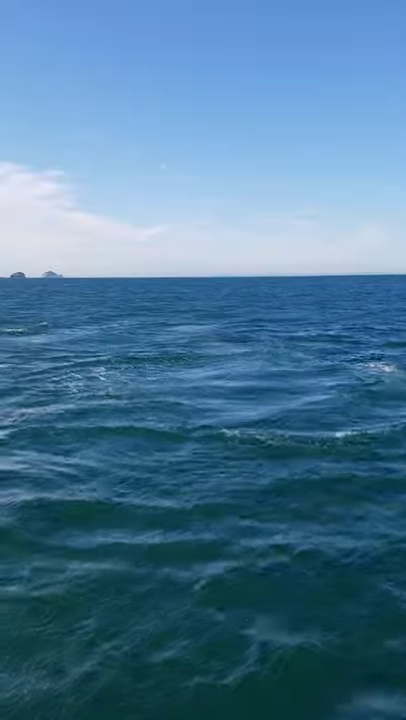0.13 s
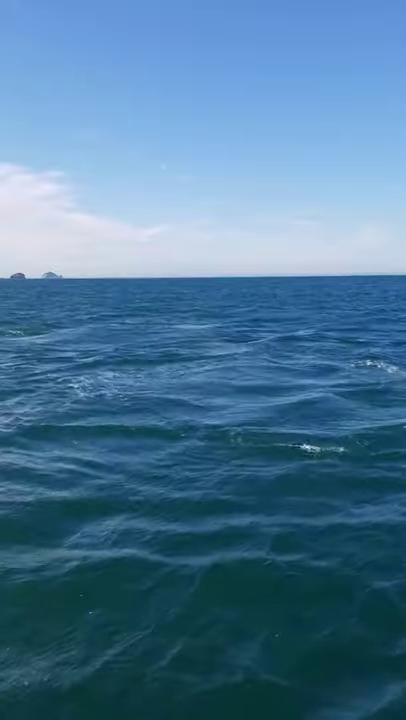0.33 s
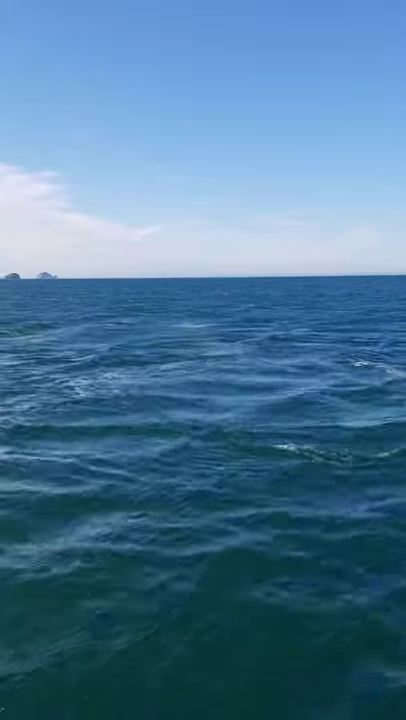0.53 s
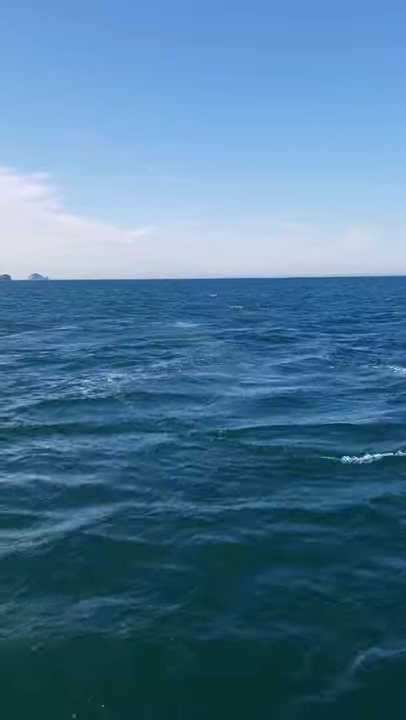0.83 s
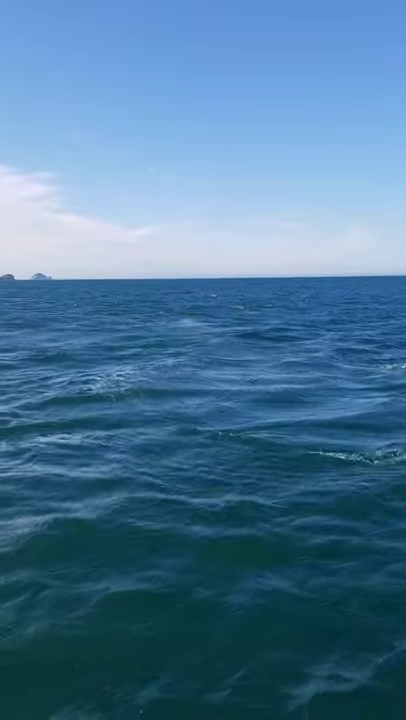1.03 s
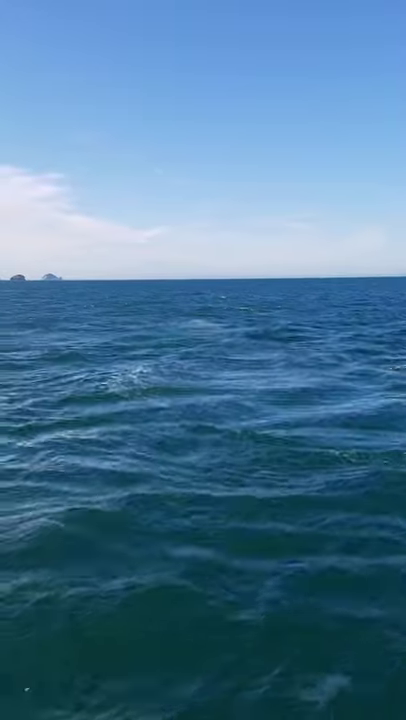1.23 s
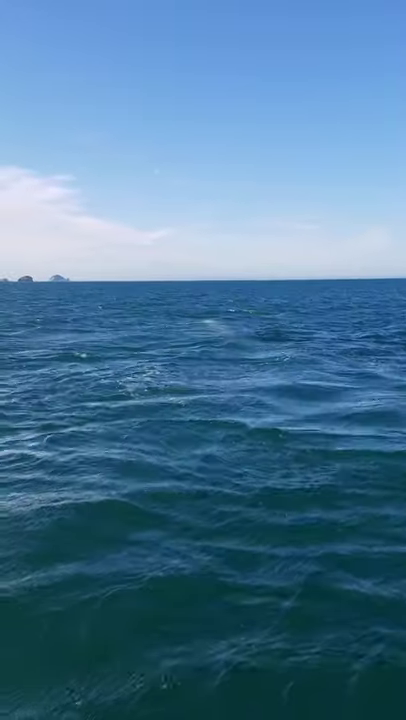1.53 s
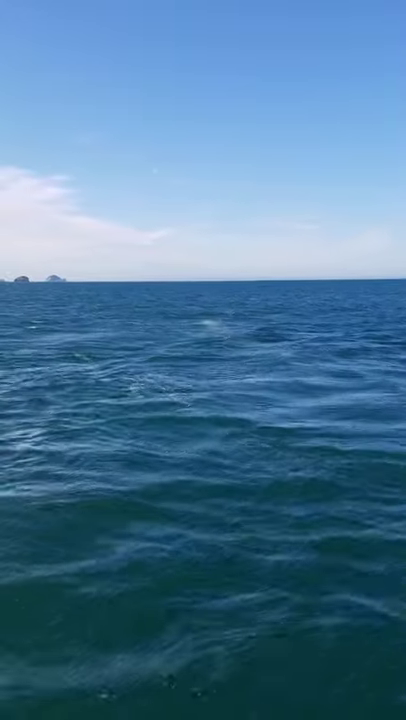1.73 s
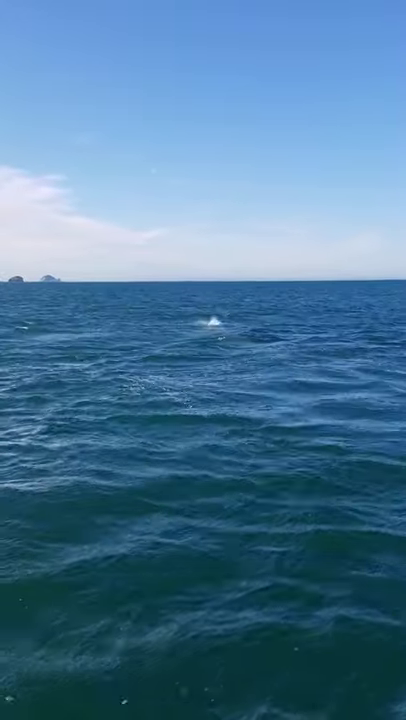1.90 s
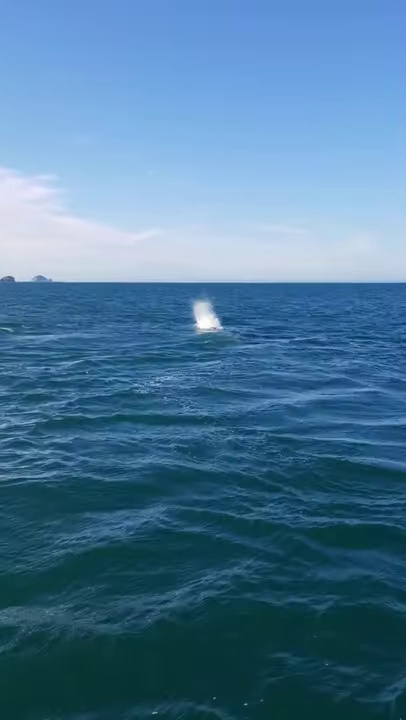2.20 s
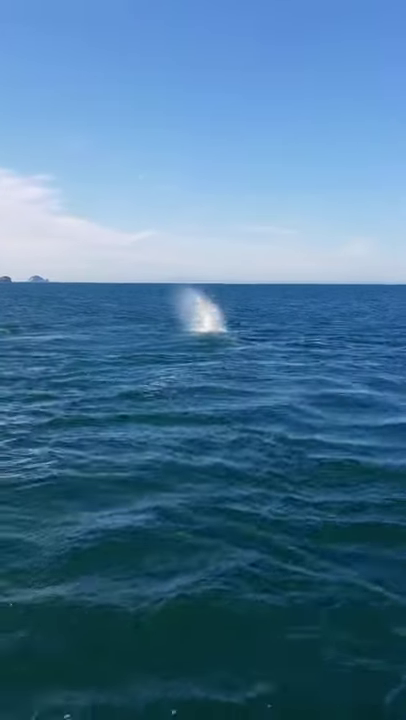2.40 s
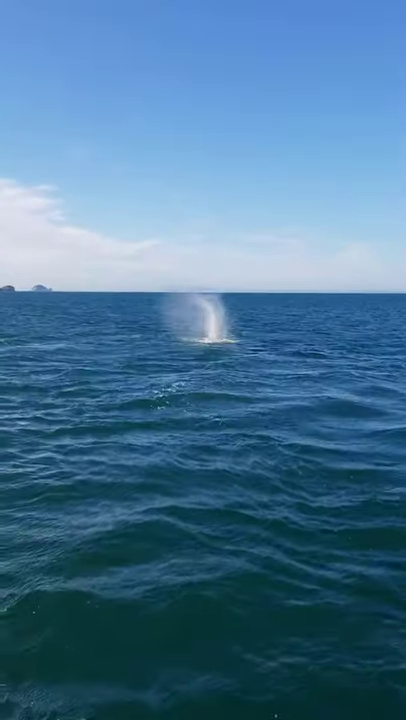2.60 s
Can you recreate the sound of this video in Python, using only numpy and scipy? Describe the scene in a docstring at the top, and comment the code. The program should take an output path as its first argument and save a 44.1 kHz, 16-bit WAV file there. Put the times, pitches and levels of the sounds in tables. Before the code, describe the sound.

A whale blows at sea, heard from a small boat. From the start, wind buffets the microphone with uneven rumbles and dull snaps, while choppy water softly washes and fizzes underneath with a few faint droplets. A soft, hollow rush sinks in pitch around 0.4 seconds. At about 2 seconds the whale exhales some way off, a breathy whoosh peaking near 2.5 seconds and trailing into hissing spray.

```python
"""After an instant of silence, wind buffets two microphone ports, rumbling and snapping throughout.
Under it choppy water washes and fizzes round a small boat, with a few droplets and faint chirps.
Early on a soft, hollow rush sinks in pitch. All along, the bass drops out in one ear or the other.
At about 2 s a whale surfaces some way off and blows: air leaves its blowhole in a breathy whoosh,
then its spray hisses."""
import sys
import numpy as np
from scipy import signal
from scipy.fft import rfft, irfft
from scipy.io import wavfile
from scipy.ndimage import uniform_filter1d

SR = 44100
rng = np.random.default_rng(int(sys.argv[2]) if len(sys.argv) > 2 else 0)


def transcribe(signal):
    """Save signal, clipped to [-1, 1], as a 16-bit WAV file at the path in sys.argv[1]."""
    frames = np.atleast_2d(signal).T
    limited = np.clip(frames, -1, 1)
    pcm = np.round(limited * 32767).astype(np.int16)
    wavfile.write(sys.argv[1], SR, pcm)


N = 121275
T = np.arange(N) / SR

# how loud the water's wash and the foam's fizz are over time (t/s, level/dB)
WASH_LEVELS = [(.07, -39), (.17, -47), (.3, -43), (.54, -40), (.68, -51), (.98, -58), (1.13, -49.5),
               (1.3, -60), (1.45, -45), (1.6, -63), (1.85, -49), (2.05, -46), (2.75, -49)]
FOAM_LEVELS = [(.07, -52), (.3, -57), (.54, -53.5), (.68, -59), (.85, -55.5), (1.02, -53), (1.12, -58.5),
               (1.29, -58.5), (1.38, -55.5), (1.6, -52.5), (1.8, -52.5), (2.05, -56), (2.75, -49)]
# their tone, from bass to treble (f/Hz, relative level/dB)
WASH_TONE = [(30, -1), (200, -7), (400, -1), (700, -9), (1100, -21), (1800, -40), (3000, -44), (8000, -70)]
FOAM_TONE = [(400, 3.5), (1100, 2.5), (1900, 2), (2600, -7), (3600, -10), (5300, -12), (6600, -23.5),
             (8500, -36.5), (12500, -15.5), (16000, -24)]
# small splashes (t/s, level/dB, f/Hz, decay/s)
SPLASHES = [(.4695, -62, 3600, .006), (.535, -60, 4300, .012), (0.6026, -56, 4500, 0.0056),
            (.9983, -55, 4600, 0.0022), (1.309, -64, 4040, 0.0017), (1.694, -54.5, 4140, 0.0027),
            (2.149, -57, 4600, 0.0033)]
# faint chirps (middle t/s, half length/s, level/dB, f/Hz, glide/(Hz per s))
FAINT_CHIRPS = [(0.102, 0.02, -46.5, 1250, -500), (.473, 0.007, -59.5, 3600, 4999),
                (0.685, .02, -66, 2570, 8010), (0.961, 0.01, -59, 3210, 3), (1.511, .01, -64, 3340, 3005),
                (2.217, 0.015, -58, 3380, -300)]
# wind between the buffets (t/s, relative level/dB)
WIND_LEVELS = [(.07, -30.5), (.17, -27), (.25, -21), (.52, -30), (.62, -24.5), (.82, -29.5), (1.0, -25),
               (1.12, -30), (1.29, -30), (1.42, -23.5), (1.6, -35), (1.72, -29), (1.83, -35.5),
               (1.96, -21.5), (2.08, -33.5), (2.2, -26.5), (2.35, -26), (2.5, -38), (2.64, -24.5),
               (2.75, -29)]
# buffets (middle t/s, half length/s, relative rumble/dB, its left minus right/dB, relative flutter/dB)
WIND_BUFFETS = [(0.105, 0.015, -15.5, 5.5, -42), (0.257, 0.02, -19.5, 12, -46),
                (0.28, 0.013, -27.5, 6, -31), (0.365, 0.0087, -12, -10.5, -21),
                (0.405, 0.0093, -40, 3, -28), (0.447, 0.027, -19, 7.5, -33.5),
                (0.599, 0.024, -16.5, 0, -30.5), (0.645, 0.013, -22, 12, -39),
                (0.672, 0.013, -18.5, -9, -23.5), (0.746, 0.018, -10.5, 0, -18.5),
                (0.778, 0.022, -20, -12.5, -16.5), (0.811, 0.011, -29, -3, -22.5),
                (0.845, 0.0096, -21.5, 16, -20), (0.869, 0.019, -13, 4, -36),
                (0.962, 0.011, -19, 10, -23.5), (1.054, 0.027, -42, -4, -28.5),
                (1.135, 0.0066, -40, -8, -31), (1.182, 0.026, -20.5, 13, -30.5),
                (1.208, 0.014, -24.5, -18.5, -29), (1.246, 0.016, -26, -15, -52),
                (1.377, 0.0095, -10, -1, -16), (1.422, 0.02, -23, 1, -27.5), (1.526, 0.028, -22, -6, -36),
                (1.576, 0.027, -27, -1, -44), (1.661, 0.035, -23, -13, -31.5),
                (1.713, 0.0099, -26, 7, -19.5), (1.777, 0.018, -23, -10, -33),
                (1.919, 0.02, -38, -6, -23.5), (1.987, 0.012, -29, -9, -23), (2.003, 0.013, -18, 7, -23),
                (2.076, 0.031, -24, 9, -32), (2.125, 0.048, -17, 6, -33.5), (2.193, 0.014, -34.5, -35, -19),
                (2.225, 0.006, -16, 1, -14), (2.237, 0.012, -12, -7, -18), (2.402, 0.026, -18, 8, -42),
                (2.47, 0.026, -15, 11, -23), (2.51, 0.017, -6.5, 6.5, -22),
                (2.536, 0.021, -15.5, -3, -18.5), (2.58, 0.026, -25.5, -14, -13.5),
                (2.674, 0.0086, -43, 2, -23.5), (2.745, 0.018, -13.5, 10.5, -24)]
# snaps of wind at the ports (t/s, relative level/dB, left minus right/dB)
WIND_SNAPS = [(0.369, -51, 8), (0.601, -32, -25), (0.748, -36, 10), (0.781, -30, -13), (0.847, -32, -15),
              (0.908, -36.5, -21), (1.172, -38.5, 3), (1.272, -42, -18), (1.311, -45, 1.0),
              (1.613, -39, 11), (1.657, -33.5, 9), (1.887, -34, 9), (1.91, -28.5, 5), (1.989, -28, 5),
              (2.055, -35, 19), (2.095, -38, 20), (2.222, -37, 5), (2.566, -27.5, 22)]
# tone of the wind's rumble, flutter and snaps (f/Hz, relative level/dB)
RUMBLE_TONE = [(15, -34), (30, -21), (42, -6.5), (58, -2), (80, -5), (115, -4), (170, -10), (240, -16.5),
               (400, -31), (900, -64.5), (3000, -88.5)]
FLUTTER_TONE = [(60, -18), (170, -1), (250, 9), (400, 4), (600, -6.5), (900, -20.5), (1500, -32),
                (2500, -47), (5000, -58.5), (16000, -84.5)]
SNAP_TONE = [(100, -8), (350, 10.5), (650, 8), (1200, -10.5), (2200, -20.5), (3500, -40), (6000, -59.5),
             (16000, -75)]
# how loud the whale's air and spray are over time (t/s, level/dB)
AIR_LEVELS = [(1.98, -57), (2.12, -42), (2.23, -37), (2.31, -33.5), (2.37, -33.5), (2.43, -33.5),
              (2.5, -28), (2.58, -36), (2.68, -37.5), (2.75, -45)]
SPRAY_LEVELS = [(2.05, -83), (2.22, -71), (2.33, -56), (2.4, -55), (2.53, -57), (2.63, -53.5), (2.7, -56.5),
                (2.75, -61)]
# their tone (f/Hz, relative level/dB)
AIR_TONE = [(100, -5.5), (300, 4), (520, 3.5), (720, -0.5), (1000, -6), (1350, -11), (1590, -14.5),
            (1790, -13), (2150, -16), (2800, -24.5), (3700, -32.5), (6000, -50), (16000, -70)]
SPRAY_TONE = [(800, -32), (2500, 26.5), (3800, 11), (5650, 18), (6350, -16), (7300, 12), (8300, -5),
              (10100, 10), (11200, 3), (13000, 8.5), (16000, -14)]
# hollow resonances of the blow (f/Hz at 2.35 s, half width/Hz, relative level/dB)
BLOW_RESONANCES = [(554, 60, -10.5), (913, 230, -12.5), (1364, 63, -18), (2154, 92, -23)]
# when each ear loses its bass (from t/s, to t/s); a backwards span does little or nothing
LEFT_DROPOUTS = [(1.189, 1.238), (1.437, 1.505), (1.601, 1.61), (1.66, 1.63), (1.757, 1.943), (2.03, 2.154)]
RIGHT_DROPOUTS = [(0.066, 0.091), (0.117, 0.22), (0.298, 0.37), (0.475, 0.59), (0.888, 0.94),
                  (0.984, 1.085), (1.268, 1.318), (2.278, 2.378), (2.427, 2.36), (2.613, 2.72)]
# tone of the microphone's hiss (f/Hz, relative level/dB)
HISS_TONE = [(1000, -37), (6500, 3), (9000, 0.5), (12500, 0.5), (16000, 0.5)]


def amp(db):
    """Turns decibels into a gain, the number a sound is multiplied by."""
    return 10 ** (np.asarray(db) / 20)


def unit(x):
    """Scales a signal to an average strength (rms) of 1."""
    return x / np.sqrt(np.mean(x ** 2) + 1e-20)


def lean(db):
    """Gains for the two ears, with the left louder by db."""
    return amp(db * np.array([[.5], [-.5]]))


def curve(levels):
    """Gain over time from (t/s, level/dB) points."""
    return amp(np.interp(T, *np.transpose(levels)))


def swell(middle_s, half_length_s):
    """A smooth rise and fall round one moment."""
    return np.exp(-((T - middle_s) / half_length_s) ** 2)


def colour(tone, hz):
    """Gain at each frequency from (f/Hz, level/dB) points."""
    f, db = np.transpose(tone)
    return amp(np.interp(np.log(hz + 1), np.log(f), db))


def lowpass(x, hz, steepness=4):
    """Keeps the part of a signal that lies below hz."""
    return irfft(rfft(x) / (1 + (np.fft.rfftfreq(N, 1 / SR) / hz) ** steepness), N)


def noise(tone):
    """Noise with the given tone, unrelated in the two ears."""
    white = rng.standard_normal((2, N))
    return unit(irfft(rfft(white) * colour(tone, np.fft.rfftfreq(N, 1 / SR)), N))


def band(hz, half_width_hz):
    """A narrow band of noise that follows a pitch curve."""
    a, b = unit(lowpass(rng.standard_normal((2, 2, N)), half_width_hz))
    phase = 2 * np.pi * np.cumsum(hz) / SR
    return unit(a * np.cos(phase) + b * np.sin(phase))


def eddies(rate_hz, depth_db):
    """A gain that wobbles at random like swirling air, half shared by the two ears."""
    drift = lowpass(rng.standard_normal((3, N)), rate_hz)
    wobble = unit(drift[:2] + drift[2])
    return unit(amp(depth_db * np.clip(wobble, -2, 2)))


def steadied(x, window_s):
    """Evens out a noise's own swells, so that a gain curve sets its strength."""
    window = np.hanning(int(window_s * SR))
    power = signal.oaconvolve(x ** 2, window[None] / window.sum(), "same")
    return x / np.sqrt(abs(power) + .02)


def watery(tone, likeness, patchy_db):
    """Noise with brief random patches in time and pitch; likeness (0 to 1) makes the ears alike."""
    hz = np.fft.rfftfreq(512, 1 / SR)
    a, b, c, d, patches = rng.standard_normal((N // 128 + 5, len(hz), 5)).T
    patches = uniform_filter1d(patches, size=7, axis=0)  # smooth across pitch
    patches = unit(uniform_filter1d(patches, size=8, axis=1))  # and across time
    left = a + 1j * b
    right = likeness * left + np.sqrt(1 - likeness ** 2) * (c + 1j * d)
    lag_s = .00009  # sound from the sea reaches the left port first
    right *= np.exp(-2j * np.pi * hz * lag_s)[:, None]
    spectra = np.array([left, right]) * colour(tone, hz)[:, None] * amp(patchy_db * patches)
    return unit(signal.istft(spectra, nperseg=512, noverlap=384)[1][:, :N])


def sea():
    """Small waves wash against the hull, and their foam fizzes."""
    foam = curve(FOAM_LEVELS) * watery(FOAM_TONE, likeness=.24, patchy_db=2.5)
    wash = curve(WASH_LEVELS) * watery(WASH_TONE, likeness=.16, patchy_db=5)
    return wash + foam


def droplets():
    """Each splash is a brief burst of noise round one pitch."""
    out = np.zeros((2, N))
    t = np.arange(SR // 8) / SR
    f = np.fft.rfftfreq(len(t), 1 / SR)
    for start_s, db, hz, decay_s in SPLASHES:
        half_width_hz = .295 * hz
        peak = 1 / (1 + ((f - hz) / half_width_hz) ** 2)
        burst = unit(irfft(rfft(rng.standard_normal((2, len(t)))) * peak, len(t)))
        start = round(start_s * SR)
        out[:, start:start + len(t)] += amp(db) * burst * np.exp(-t / decay_s)
    return out


def chirps():
    """Faint, brief chirps that slide in pitch."""
    return sum(amp(db) * swell(middle_s, half_s) * band(hz + glide * (T - middle_s), half_width_hz=93)
               for middle_s, half_s, db, hz, glide in FAINT_CHIRPS)


def rush():
    """A soft, hollow rush that sinks in pitch, a little to the right."""
    middle_s, fall_hz_per_s = .38, 900
    hollow = band(760 - fall_hz_per_s * (T - middle_s), half_width_hz=104)
    return amp(-49.5) * lean(-1.5) * swell(middle_s, half_length_s=.24) * hollow


def wind():
    """Air swirls at each port: a deep rumble and a higher flutter, both surging with each buffet."""
    breeze = curve(WIND_LEVELS)
    rumble_power = (breeze * amp(-2) * eddies(rate_hz=44, depth_db=2)) ** 2
    flutter_power = (breeze * amp(-14.5) * eddies(rate_hz=76.5, depth_db=6.5)) ** 2
    for middle_s, half_s, rumble_db, lean_db, flutter_db in WIND_BUFFETS:
        surge = amp(-3.5) * swell(middle_s, half_s) ** 2
        rumble_power += (surge * amp(rumble_db) * lean(lean_db)) ** 2
        flutter_power += (surge * amp(flutter_db)) ** 2
    rumble = np.sqrt(rumble_power) * steadied(noise(RUMBLE_TONE), window_s=.04)
    flutter = np.sqrt(flutter_power) * steadied(noise(FLUTTER_TONE), window_s=.02)
    return rumble + flutter


def snaps():
    """Swirls of air that break on a port give short, dull cracks."""
    rise_s, decay_s, boost_db = .00046, .0034, 4
    power = np.zeros((2, N))
    for peak_s, db, lean_db in WIND_SNAPS:
        age = T - peak_s
        shape = np.exp(np.minimum(age / rise_s, -age / decay_s))
        power += (shape * amp(db + boost_db) * unit(lean(lean_db))) ** 2
    return np.sqrt(power) * steadied(noise(SNAP_TONE), window_s=2 * decay_s)


def whale_blow():
    """The whale breathes out: a sputtering, hollow rush of air, and spray that hisses on as it fades."""
    rise = 2 ** (.25 * (T - 2.35))  # the resonances climb a quarter octave a second as air rushes out
    breath = watery(AIR_TONE, likeness=.46, patchy_db=3)
    hollow = sum(amp(db) * band(hz * rise, half_width) for hz, half_width, db in BLOW_RESONANCES)
    spray = watery(SPRAY_TONE, likeness=.46, patchy_db=1.8)
    sputter = eddies(rate_hz=70, depth_db=2)
    return curve(AIR_LEVELS) * sputter * (breath + hollow) + curve(SPRAY_LEVELS) * spray


def scene():
    """Wind at the microphone, water round the boat and the whale beyond."""
    return wind() + snaps() + sea() + droplets() + chirps() + rush() + whale_blow()


def drop_bass(x, spans):
    """Fades the bass out of one ear and back in for each span of time."""
    depth_db, fade_s = -32, .048
    bass = lowpass(x, hz=298, steepness=12)
    cut = sum(np.clip(np.minimum(T - start, end - T) / fade_s + .5, 0, 1) for start, end in spans)
    return x - bass * (1 - amp(depth_db * cut))


def record(dry):
    """Adds the bass dropouts, microphone hiss and a silent first moment, then cuts the top treble."""
    ears = np.array([drop_bass(dry[0], LEFT_DROPOUTS), drop_bass(dry[1], RIGHT_DROPOUTS)])
    hiss = amp([[-67], [-80.5]]) * noise(HISS_TONE)  # left, right
    heard = (ears + hiss) * (T > .069)
    treble_cut = signal.firwin(511, cutoff=15780, window=("kaiser", 9), fs=SR)
    return signal.oaconvolve(heard, treble_cut[None], "same")


dry = scene()
out = record(dry)
transcribe(out)
```